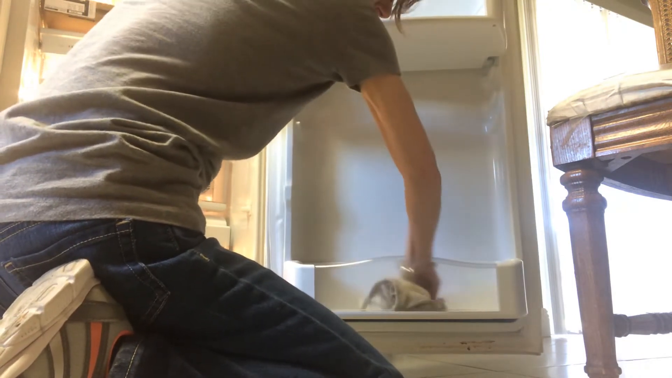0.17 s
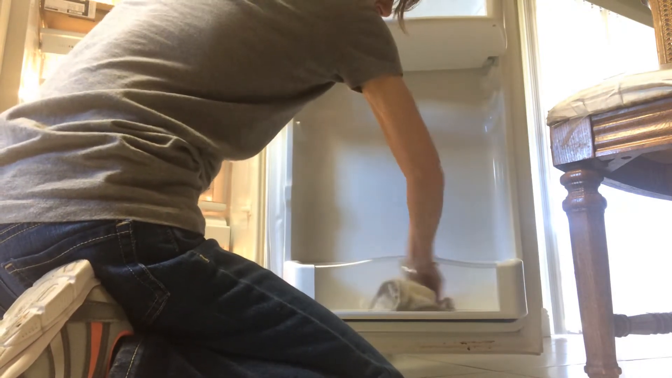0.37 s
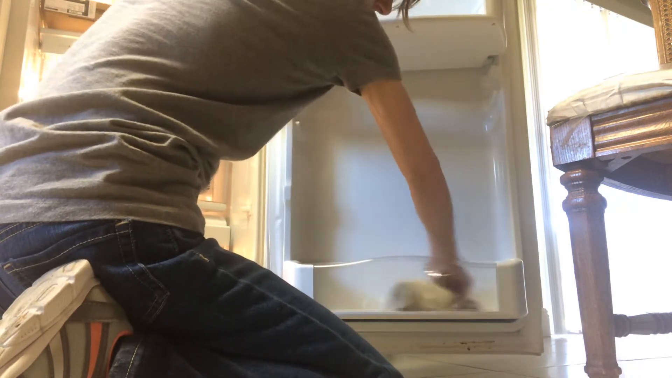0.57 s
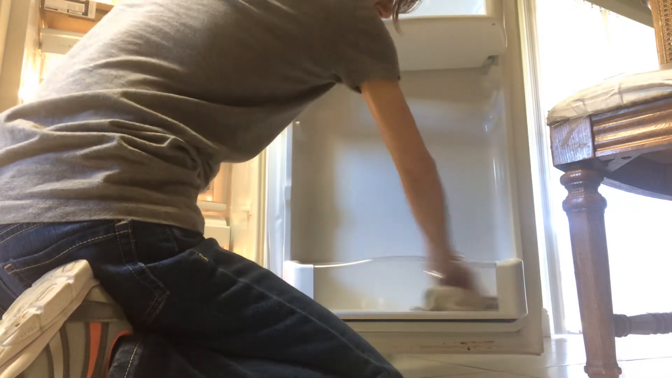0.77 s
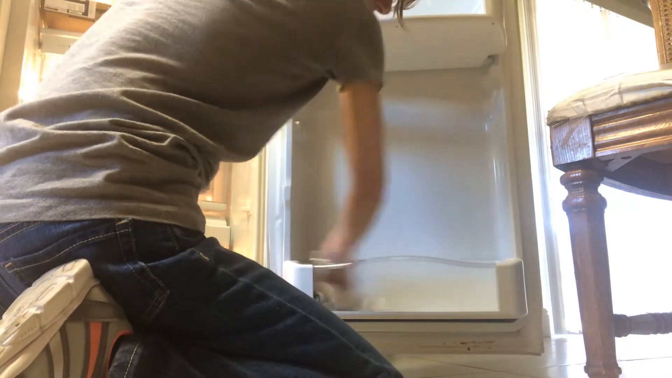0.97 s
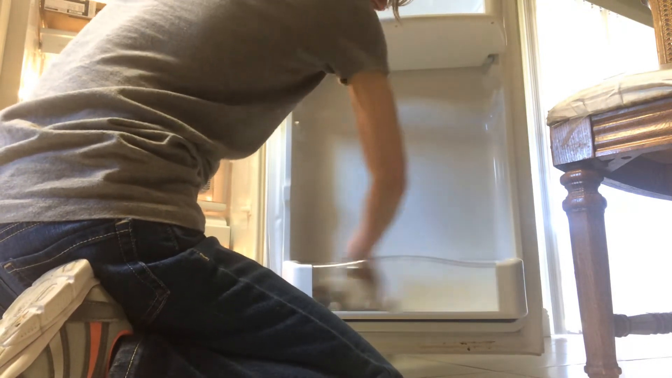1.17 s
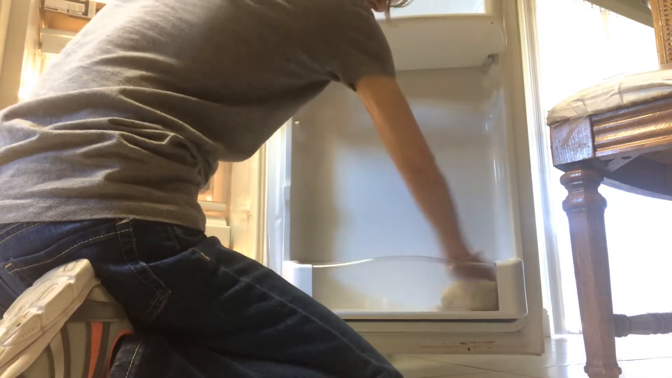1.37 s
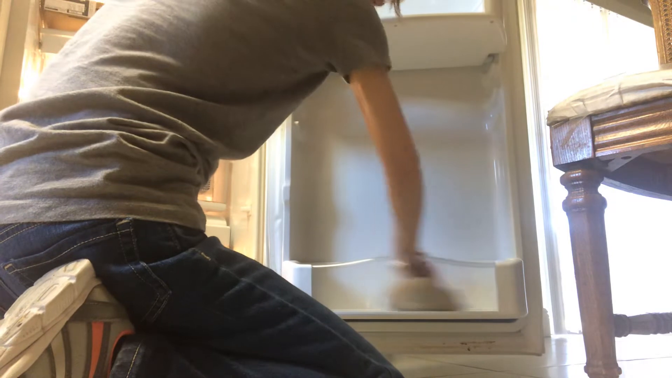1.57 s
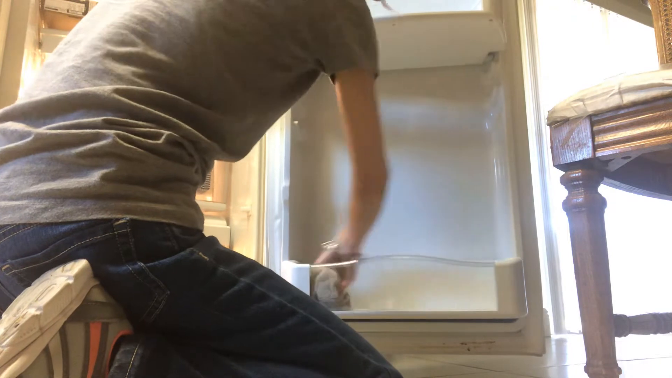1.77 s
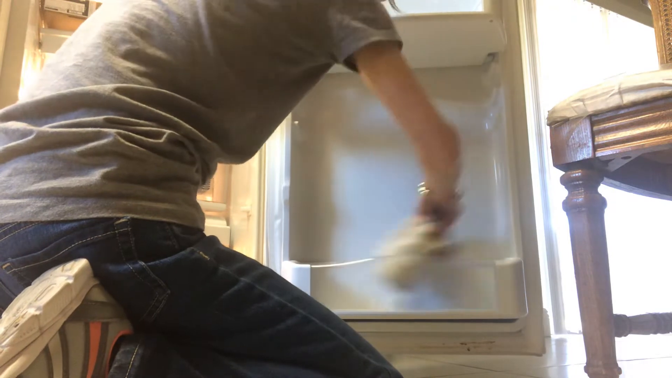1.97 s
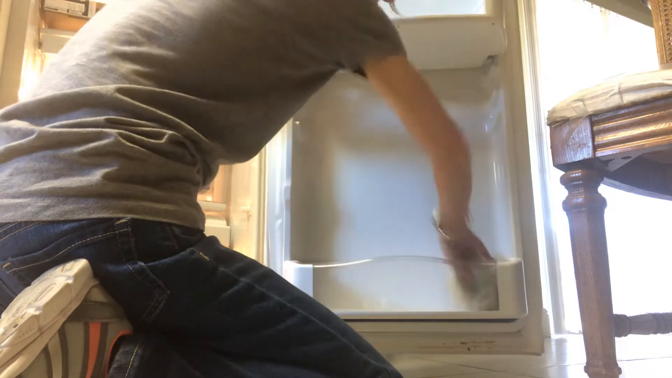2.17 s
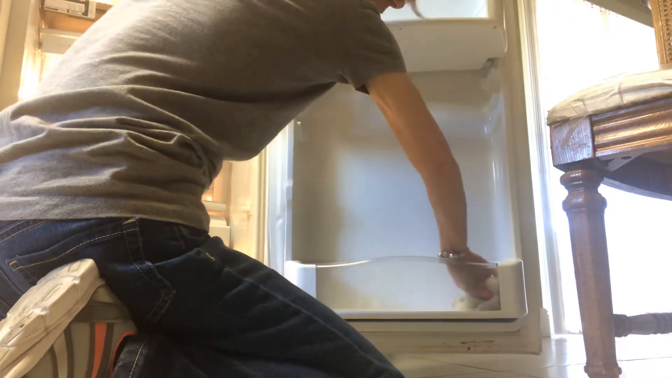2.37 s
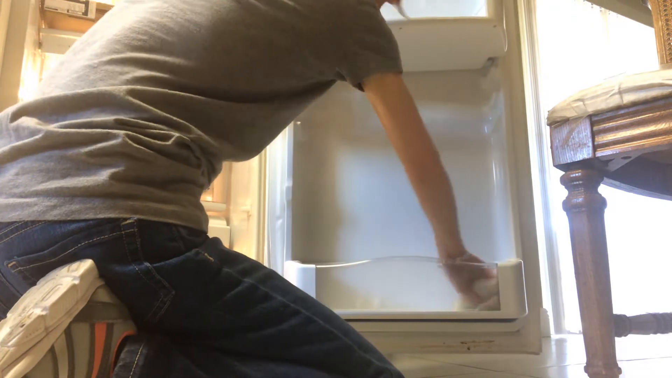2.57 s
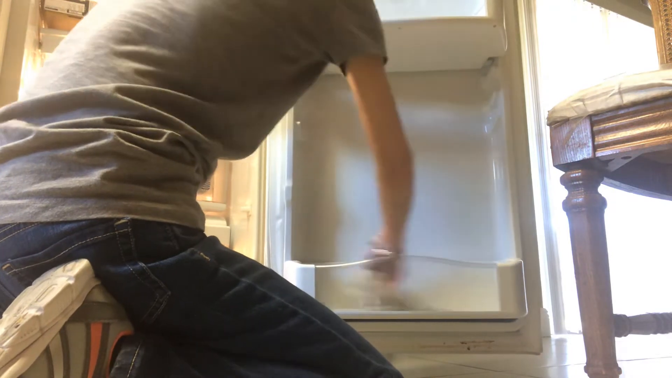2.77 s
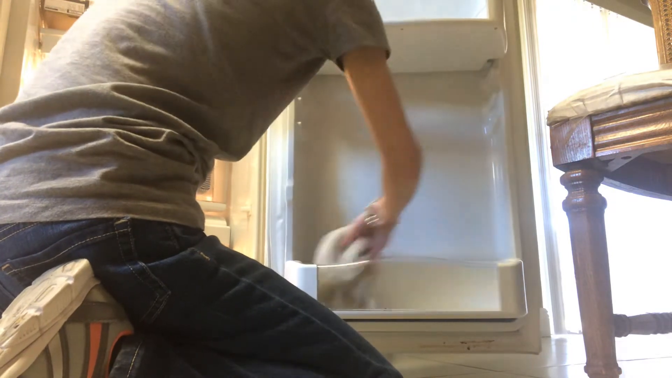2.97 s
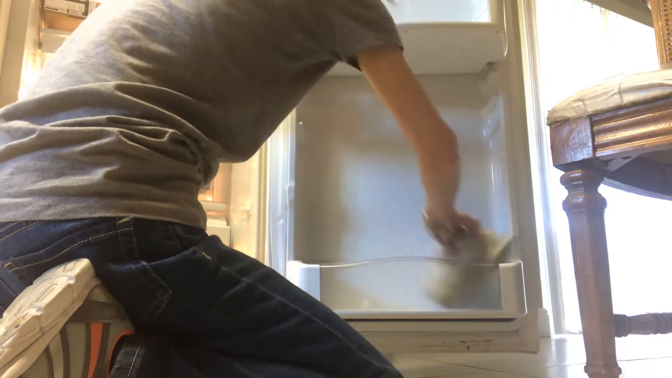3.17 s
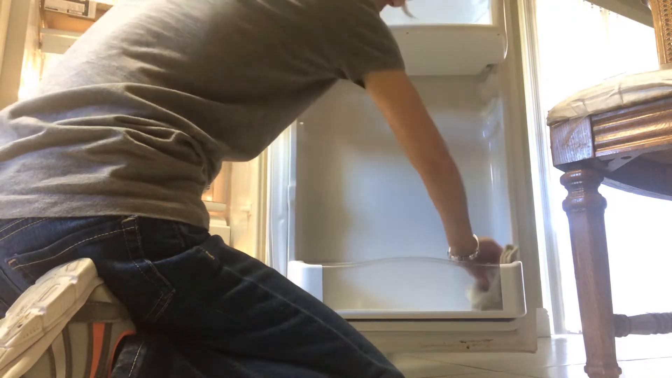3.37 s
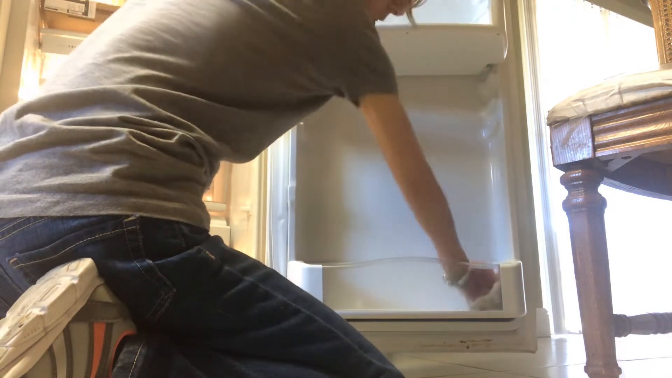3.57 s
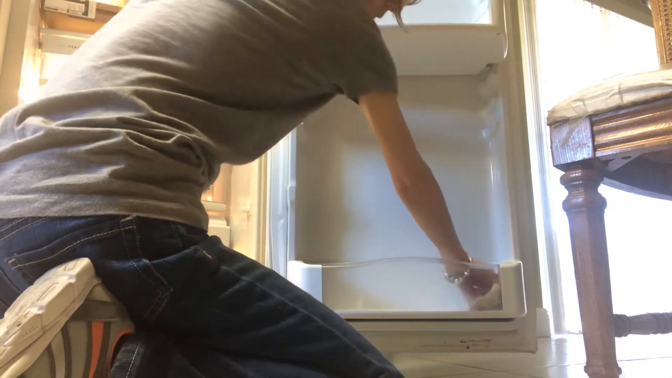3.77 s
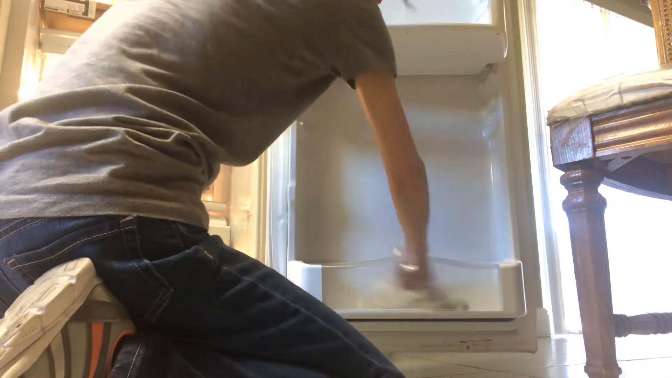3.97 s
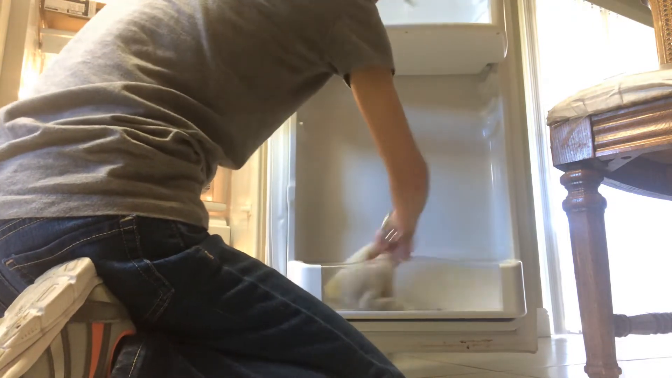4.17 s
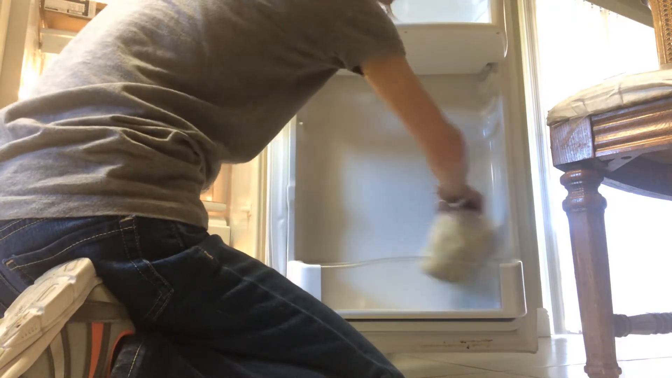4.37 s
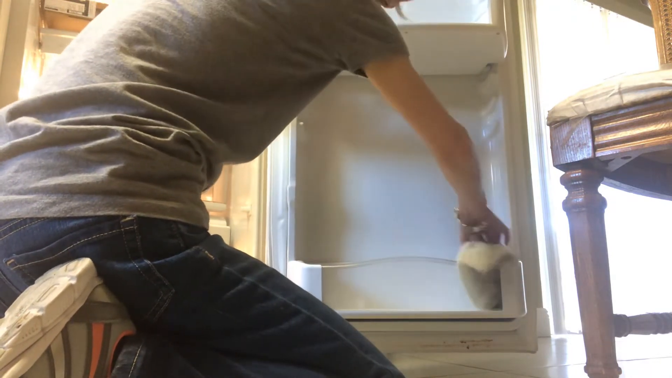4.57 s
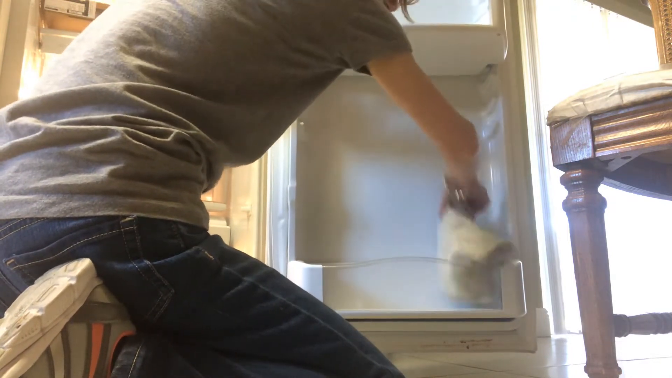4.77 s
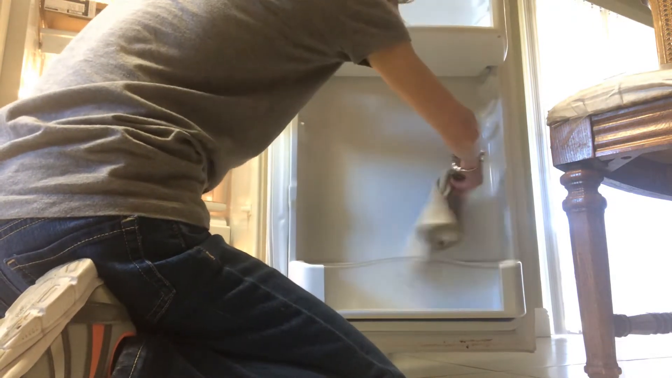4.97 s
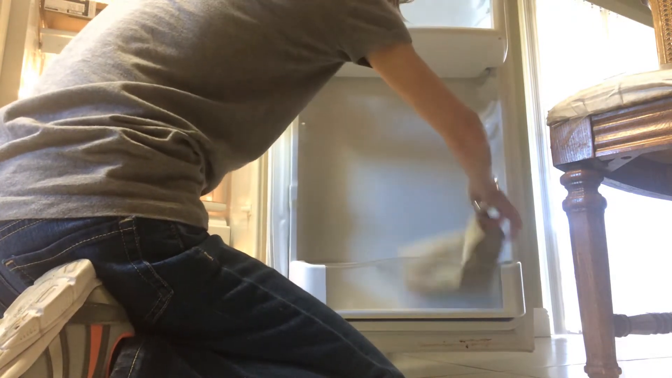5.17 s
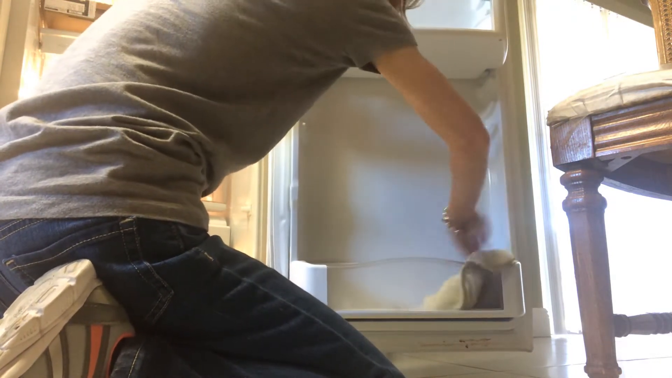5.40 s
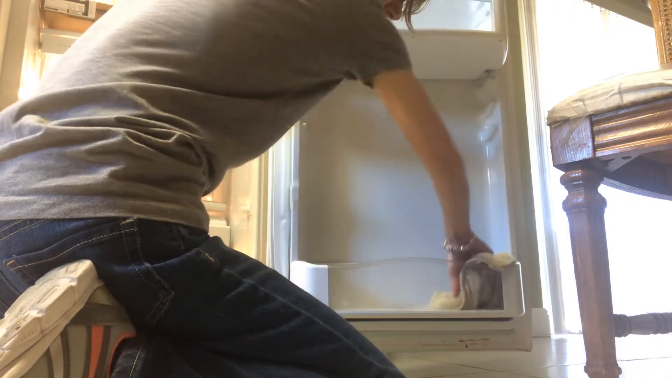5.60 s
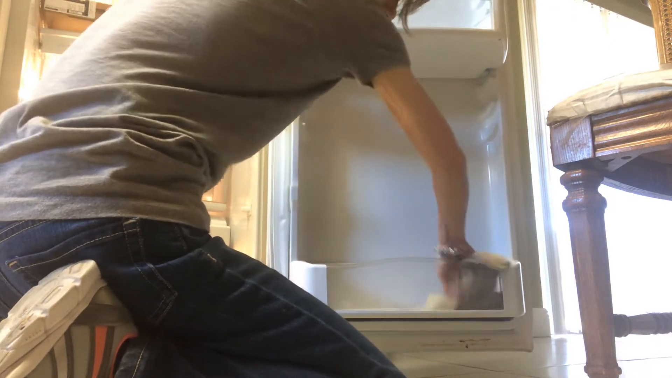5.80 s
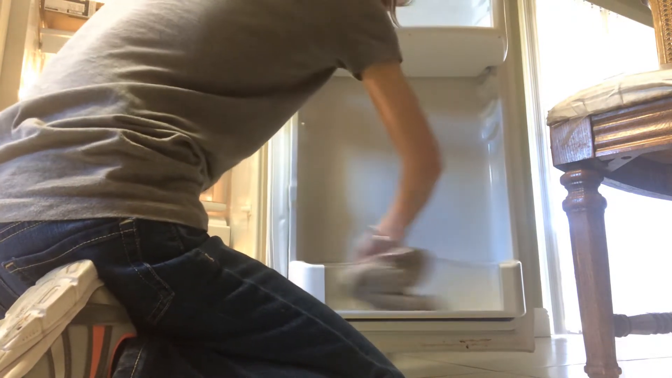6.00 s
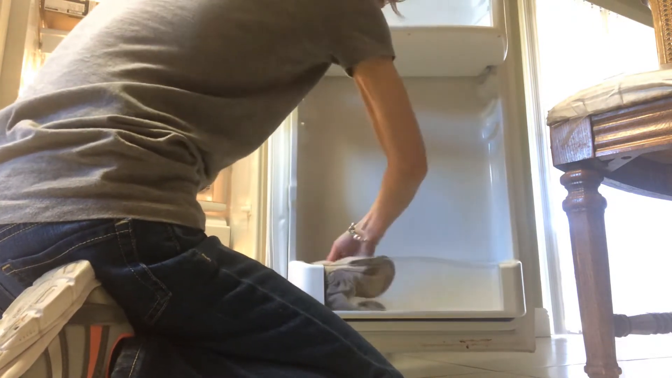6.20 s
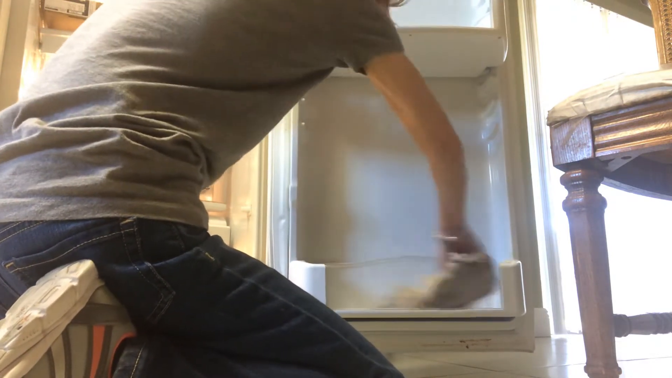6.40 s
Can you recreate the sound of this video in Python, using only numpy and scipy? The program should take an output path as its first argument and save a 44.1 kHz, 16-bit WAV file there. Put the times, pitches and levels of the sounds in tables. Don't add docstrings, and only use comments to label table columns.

```python
import sys
import numpy as np
from scipy import signal
from scipy.io import wavfile
from scipy.ndimage import uniform_filter1d

SR = 44100
rng = np.random.default_rng(int(sys.argv[2]) if len(sys.argv) > 2 else 0)


def amplitude_ratio(level_db):
    exponent = np.asarray(level_db, float) / 20
    return 10 ** exponent


def wav_out(sig):
    wavfile.write(sys.argv[1], SR, np.round(np.clip(np.atleast_2d(sig).T, -1, 1) * 32767).astype(np.int16))


N = 284004
T = np.arange(N) / SR
SLOW = T[::44]

# [t/s, peak level/dB, lower mode f/Hz, upper mode relative level/dB]
THUDS = [(0.0, -37.5, 328, -9), (0.18, -28.5, 346, -3), (0.237, -25.5, 309, -4), (0.26, -33, 318, -16.5),
         (0.428, -29, 351, -3), (0.486, -29.5, 311, 0.5), (0.747, -21, 390, 4), (1.202, -35, 292, -19),
         (1.721, -38, 402, 3), (2.003, -33, 344, 3), (2.029, -33.5, 393, 4), (2.633, -16.5, 400, -5),
         (2.673, -25, 404.2, -18), (2.845, -30.5, 419, 22), (3.795, -37.5, 353, 14), (4.123, -14, 367, -6),
         (5.59, -33, 330, -11), (5.615, -36, 300, -11), (5.844, -30, 330, -10), (6.311, -26, 345, -0.5)]
# [t/s, peak level/dB, mode f/Hz, upper mode relative level/dB, contact t/s]
SLAPS = [(1.41, -23, 300, -10, .012), (1.423, -23, 300, -6, .022), (1.445, -27, 260, -15, .014),
         (2.324, -13, 390, -22, .034), (4.116, -32, 390, 3, .022), (5.18, -37, 450, 3, .018),
         (5.32, -36, 330, -10, .022), (5.355, -31, 400, -3, .018), (5.561, -21, 342, -11, .028),
         (5.819, -19, 350, 0, .025), (5.856, -28, 366, -8, .026)]
# [t/s, peak level/dB, time to fall 60 dB t/s]
JOLTS = [(1.144, -35.5, 0.041), (1.349, -30.5, 0.15), (1.374, -15, 0.09), (2.236, -37.5, 0.15),
         (2.352, -23, 0.15), (2.435, -34, 0.12), (2.547, -33, .2), (2.582, -28.5, 0.2),
         (3.288, -36.5, 0.09), (3.348, -25.5, 0.18), (3.485, -32.5, 0.049), (3.527, -27.5, 0.059),
         (4.13, -22, 0.18), (5.334, -36, 0.033), (5.347, -32, 0.03), (6.268, -39.5, 0.068)]
UPPER_HZ = 478.7
DOOR_HZ = 241.5

# [start t/s, length t/s, hiss level/dB, duller part relative level/dB]
STROKES = [(-.05, 0.16, -59.5, -0.5), (0.173, 0.037, -64, 0.5), (0.276, 0.064, -62.5, 0),
           (0.425, 0.055, -64.5, 2), (0.54, 0.24, -61, -0.5), (0.87, .19, -61, 0.5),
           (1.085, 0.026, -66, -5), (1.17, 0.2, -63.5, -1.5), (1.385, 0.023, -58, 8),
           (1.516, 0.34, -62.5, 0.5), (1.93, 0.079, -63, 2.5), (2.19, 0.2, -66.5, -3),
           (2.354, 0.12, -55.5, 12), (2.528, .09, -63, 6), (2.656, 0.021, -54, 11.5),
           (2.736, 0.073, -63.5, 2), (2.86, 0.021, -57, 3), (2.988, 0.039, -69.5, 8.5),
           (3.239, 0.036, -73.5, -1), (3.36, 0.0196, -75, 4), (3.466, 0.182, -63.5, 6),
           (3.862, 0.173, -61, -0.5), (4.133, 0.04, -61, 9), (5.316, 0.041, -81, -3.5),
           (5.447, .12, -81, -5), (5.585, 0.05, -79, 11.5), (5.802, 0.08, -72.5, 9.5),
           (5.936, 0.21, -63.5, 2), (6.19, 0.036, -70, -4), (6.315, 0.15, -69.5, -1)]
# [f/Hz, level per Hz/dB]
RUB_COLOUR = [(1500, -8), (2500, 0.5), (4000, -1.5), (7500, -3)]
# [f/Hz, level per Hz/dB]
FIZZ_COLOUR = [(4500, -31), (6000, -10), (7600, 1.5), (8500, -6.5), (11000, -3), (14500, -4.5), (15700, -5),
               (16300, -28.5)]

# [t/s, shaft f/Hz, fifth order level/dB, sixth order level/dB]
MOTOR = [(0, 215.5, -62, -60), (.7, 215.7, -62, -58), (1.4, 216, -62, -60), (1.6, 216, -62, -57),
         (2.3, 215.8, -61, -56), (2.9, 216.2, -63, -68), (3.6, 216.5, -64, -68), (4.3, 216.6, -64, -68),
         (4.9, 216.8, -65, -62), (5.2, 216.8, -64, -68), (5.7, 216.4, -62, -64), (6.44, 216.1, -62, -66)]
# [multiple of the shaft speed, rms level/dB]
STEADY_ORDERS = [(2, -56.5), (3, -67)]
# [f/Hz, width f/Hz, level/dB]
DRONES = [(55.11, 13, -2), (90, 14, -3), (139, 22, 5.5), (219.8, 28, -3.5), (236, 10, -4.5)]
# [t/s, length t/s, level/dB]
SHOVES = [(-.02, 0.027, -42), (0.232, 0.074, -46), (0.57, 0.017, -49.5), (0.72, 0.024, -48.5),
          (1.194, .04, -48.5), (1.383, 0.094, -39.5), (2.366, .05, -45.5), (2.638, 0.06, -41),
          (2.72, .05, -43), (3.34, 0.019, -53), (5.321, 0.1, -53), (5.569, 0.031, -44),
          (5.817, 0.041, -43.5), (6.29, .2, -49)]
# [f/Hz, level per Hz/dB]
AIR = [(32, -31), (50, 8), (120, -13), (400, -6.5), (750, -13.5), (900, -22), (1400, -19), (1750, -27.5),
       (3000, -34), (7000, -43.5), (8500, -62.5), (15500, -57), (16500, -76)]

# [t/s, peak level/dB, centre f/Hz, length t/s]
TICKS = [(0.099, -37, 6750, 0.005), (0.241, -41, 7460, 0.0044), (0.4818, -42, 7800, 0.0054),
         (.76, -44, 6500, .005), (1.097, -42, 9000, 0.009), (1.822, -42, 7600, 0.0087),
         (1.911, -35, 7060, 0.004), (1.9303, -35, 10400, 0.0033), (2.1206, -53, 14200, 0.004),
         (2.139, -48, 14200, 0.0045), (2.151, -42, 10400, 0.0048), (2.198, -40, 9930, 0.0045),
         (2.236, -38.5, 6760, 0.0037), (3.425, -52, 3500, 0.006), (3.446, -45, 3800, .008),
         (3.475, -38, 3500, .01), (3.516, -37, 3200, .012), (4.119, -28, 5500, .006),
         (5.121, -46, 1600, .008), (5.344, -41.5, 1250, .005), (5.35, -39.5, 1250, .005),
         (5.498, -51, 6830, 0.0041), (5.5219, -40, 10300, 0.0071), (5.7269, -49.5, 5930, 0.0045),
         (5.797, -50, 7060, 0.0061), (5.93, -43, 6870, 0.0043)]
# [t/s, peak level/dB, centre f/Hz, length t/s]
STRIKES = [
    (1.3447, -20, 11350, 0.0055),
    (1.371, -18.5, 10500, .005),
    (1.403, -26, 12000, 0.0045),
    (2.326, -14.5, 11910, 0.0096),
    (2.844, -31, 5000, 0.007),
    (3.554, -28, 11940, 0.0053),
    (4.131, -27.5, 7000, 0.007),
]
# [t/s, floor modes peak level/dB, wall modes peak level/dB, rim modes peak level/dB]
KNOCKS = [(0.738, -28, -36, -38), (1.034, -43, -48, -48.5), (1.14, -34.5, -38, -35),
          (1.345, -34.5, -35.5, -26), (1.368, -23, -22.5, -27.5), (1.4, -43, -42, -44),
          (1.989, -53, -47.5, -50), (2.325, -19, -15.5, -9), (2.362, -33, -28, -36),
          (2.436, -26.5, -23, -19), (2.525, -34, -30, -30), (2.579, -35, -25.5, -48),
          (2.631, -27, -24.5, -33), (2.651, -25, -23, -20.5), (2.677, -30, -28.5, -28),
          (2.843, -32, -28.5, -21.5), (3.342, -38, -31, -26), (3.446, -37, -37, -38),
          (3.477, -34, -30, -31.5), (3.516, -28, -31, -29), (3.528, -27, -26.5, -47.5),
          (3.552, -38, -25.5, -19), (3.791, -42.5, -48, -47), (4.12, -39, -23, -18.5),
          (4.129, -20.5, -23.5, -15.5), (5.345, -40, -46, -52), (5.572, -48, -47, -54),
          (5.83, -42, -44, -39), (5.852, -27.5, -38, -29.5)]
# [peak t/s, level/dB, build-up by 20 dB t/s, dying by 20 dB t/s]
RATTLES = [
    (1.372, -15.5, .012, 0.021),
    (2.342, -18.5, .005, .05),
    (2.44, -26, .01, 0.1),
    (2.559, -34.5, .3, 0.22),
    (2.658, -28.5, 0.061, 0.087),
    (3.352, -22, .005, 0.0426),
    (3.478, -22.5, 0.041, 0.09),
    (5.354, -48, 0.052, 0.024),
    (5.59, -42, .025, .2),
]
# [f/Hz, level/dB, time to fall 60 dB t/s]
FLOOR_MODES = [(640, -12, .015), (730, -5, .02), (790, -2, .022), (865, -1, .025), (980, -3, .02),
               (1090, 0, .035), (1190, -3, .02)]
# [f/Hz, level/dB, time to fall 60 dB t/s]
WALL_MODES = [(1300, -3, .018), (1400, -2, .02), (1505, 0, .03), (1600, -3, .018), (1705, -1, .025),
              (1900, -4, .012), (2150, -3, .012)]
# [f/Hz, level/dB, time to fall 60 dB t/s]
RIM_MODES = [(2300, -3, .008), (2665, -3, .011), (2900, -1, .012), (3150, -1, .01), (3450, -4, .007),
             (3850, -4, .008), (4250, -5, .007), (4650, -4, .01), (5100, -6, .007), (5500, -6, .006)]
# [t/s, f/Hz, peak level/dB, time to fall 60 dB t/s]
RINGS = [(0.738, 1150, -20, 0.011), (.737, 880, -15.5, 0.015), (0.743, 1050, -24, .015),
         (1.371, 2750, -31, .025), (1.368, 1800, -45, 0.024), (2.326, 2650, -14, .05),
         (2.328, 3130, -17, .04), (2.327, 4676, -13, 0.025), (2.329, 1600, -19.5, 0.08),
         (2.38, 1705, -27, .15), (2.328, 1100, -17, 0.05), (2.36, 1080, -22, .12), (2.69, 1100, -30, .08),
         (2.329, 783, -20.5, 0.069), (2.582, 1580, -37, 0.067), (2.654, 1520, -22, 0.1),
         (2.845, 2720, -24, 0.023), (2.844, 1670, -25.5, 0.085), (3.343, 2740, -22.5, 0.033),
         (3.346, 1140, -31, 0.082), (3.481, 1630, -28, 0.06), (3.532, 1625, -27.5, 0.17),
         (4.122, 782, -24, 0.057), (4.124, 1392, -28, 0.099), (4.124, 525, -24, .08), (3.52, 525, -27, .12),
         (3.48, 525, -31, .1), (2.366, 3950, -24, .06), (2.526, 2720, -32, .08), (5.131, 1745, -47, 0.03),
         (5.864, 3150, -36, 0.13), (5.885, 1050, -41, .15), (1.372, 880, -27, .06),
         (5.852, 2755, -31, 0.05), (5.853, 1500, -34, 0.04)]

# [f/Hz, time to fall 60 dB t/s]
KITCHEN = [(200, 0.19), (500, 0.46), (1500, .55), (4000, 0.41), (6200, .39), (8500, 0.25), (14000, 0.056)]


def read(points, hz):
    f, value = np.transpose(points)
    return np.interp(np.log(hz + 1), np.log(f + 1), value)


def column(rows, k):
    rows = np.asarray(rows)
    return np.interp(T, rows[:, 0], rows[:, k])


def evened(x):
    return x / np.sqrt(np.mean(x ** 2) + 1e-20)


def peaked(x, db):
    return amplitude_ratio(db) * x / (abs(x).max() + 1e-20)


def add(mix, s, sound):
    part = mix[max(round(s * SR), 0):][:len(sound)]
    part += sound[:len(part)]


def band(x, lo_hz, hi_hz):
    limits = [lo_hz, min(hi_hz, 16300)]
    return signal.sosfilt(signal.butter(3, limits, "band", fs=SR, output="sos"), x)


def swell(s, length, db, rise, sag, fall):
    u = SLOW - s
    return db - rise * np.maximum(-u, 0) - sag * np.clip(u, 0, length) - fall * np.maximum(u - length, 0)


def hiss(colour, patchy_db):
    frames, hz = N // 256 + 5, np.fft.rfftfreq(1024, 1 / SR)
    a, b, patches = rng.standard_normal((frames, 513, 3)).T
    patches = uniform_filter1d(patches, size=14, axis=0)
    patches = evened(uniform_filter1d(patches, size=8, axis=1))
    z = (a + 1j * b) * amplitude_ratio(read(colour, hz)[:, None] + patchy_db * patches)
    return evened(signal.istft(z, nperseg=1024, noverlap=768)[1][:N])


def ring(modes, spread_db, detune):
    hz, db, t60 = np.transpose(modes)[:, :, None]
    t = np.arange(0, min(t60.max(), .14), 1 / SR)
    luck = rng.standard_normal((len(modes), 2, 1))
    level = amplitude_ratio(db + spread_db * luck[:, 0] - 60 * t / t60)
    return (level * np.sin(2 * np.pi * hz * (1 + detune * luck[:, 1]) * t)).sum(0)


def thud(db, hz, upper_db, contact, t60):
    size = int(np.clip(contact, .001, .04) * SR)
    t = np.arange(size) / SR
    shake = np.cos(2 * np.pi * hz * t) + 0.74 * np.cos(2 * np.pi * UPPER_HZ * t)
    shake += 0.3 * np.cos(2 * np.pi * DOOR_HZ * t)
    modes = [(hz, 0, t60), (hz * 1.17, -6, t60), (UPPER_HZ, upper_db, t60),
             (315, -14, .05), (DOOR_HZ, -14, .05)]
    push = np.hanning(size) * shake
    return peaked(signal.fftconvolve(push, ring(modes, 0, 0.0048)), db)


def thuds():
    out = np.zeros(N)
    for s, *row in THUDS:
        add(out, s - .006, thud(*row, contact=0.019, t60=0.054))
    for s, *row in SLAPS:
        add(out, s, thud(*row, t60=.022))
    for s, db, t60 in JOLTS:
        add(out, s - .006, thud(db, hz=401, upper_db=-18, contact=.013, t60=t60))
    return out


def cloth():
    grain = amplitude_ratio(1.8 * evened(uniform_filter1d(rng.standard_normal(N), size=160)))
    rub_colour = [(900, -56.5)] + RUB_COLOUR + [(9000, -44)]
    fizz, rub = np.zeros((2, len(SLOW)))
    for s, length, db, dull_db in STROKES:
        power = amplitude_ratio(2 * swell(s, length, db, rise=350.5, sag=23.5, fall=200.5))
        fizz = fizz + power
        rub = rub + power * amplitude_ratio(2 * dull_db)
    fizz = np.sqrt(np.interp(T, SLOW, fizz)) * hiss(FIZZ_COLOUR, patchy_db=1.34)
    rub = np.sqrt(np.interp(T, SLOW, rub)) * hiss(rub_colour, patchy_db=1.5)
    return evened(grain) * (fizz + rub)


def motor():
    turns = 2 * np.pi * np.cumsum(column(MOTOR, 1)) / SR
    orders = STEADY_ORDERS + [(5, column(MOTOR, 2)), (6, column(MOTOR, 3))]
    out = np.zeros(N)
    for order, db in orders:
        waver = amplitude_ratio(1.3 * evened(uniform_filter1d(rng.standard_normal(N), size=4000)))
        out += amplitude_ratio(db) * waver * np.sin(round(order) * turns)
    return np.sqrt(2) * out


def rumble():
    noise, out = rng.standard_normal(N), np.zeros(N)
    for hz, width, db in DRONES:
        b, a = signal.iirpeak(hz, hz / width, SR)
        out += amplitude_ratio(db) * evened(signal.lfilter(b, a, noise))
    rocking = sum(amplitude_ratio(2 * swell(*row, rise=298.5, sag=0, fall=74)) for row in SHOVES)
    steady_db = -52.5
    return np.sqrt(amplitude_ratio(2 * steady_db) + np.interp(T, SLOW, rocking)) * evened(out)


def chatter(length, sharp):
    t = np.arange(3000) / SR
    contacts = rng.standard_normal(3000) * amplitude_ratio(2.55 * rng.standard_normal(3000))
    contacts *= amplitude_ratio(-20 * t / np.clip(length, .001, .06)) * (1 - np.exp(-t / 0.001))
    contacts[8] += sharp
    return contacts


def crack(lo_hz, hi_hz, length):
    return band(chatter(length, 2.02), lo_hz, hi_hz)


def family(drive, modes, grit=4.0):
    response = ring(modes, 2, .015)
    response[0] += grit * len(modes)
    return band(signal.fftconvolve(drive, response), modes[0][0], modes[-1][0])


def knock(floor_db, wall_db, rim_db):
    contact_s = .011
    top_hz = 3340 * 2 ** ((rim_db + 37.5) / 11.5)
    drive = band(chatter(contact_s, 2.7), 250, max(top_hz, 2500))
    out = np.zeros(9000)
    for modes, db in ((FLOOR_MODES, floor_db), (WALL_MODES, wall_db), (RIM_MODES, rim_db)):
        add(out, 0, peaked(family(drive, modes), db))
    crack_db = 2 + 1.66 * rim_db
    add(out, 0, peaked(crack(3700, 9800, 1.37 * contact_s), crack_db))
    return out


def rattle(db, rise, fall):
    t = np.arange(-rise, 2 * fall, 1 / SR)
    unevenness = evened(uniform_filter1d(rng.standard_normal(len(t)), size=90))
    contacts = rng.standard_normal(len(t)) * amplitude_ratio(3.0 * unevenness)
    walls = evened(family(contacts, FLOOR_MODES + WALL_MODES + RIM_MODES[:4])[:len(t)])
    hollow_modes = [(340, -3, .06), (405, 0, .08), (UPPER_HZ, -3, .06)]
    hollow = evened(family(contacts, hollow_modes, grit=0)[:len(t)])
    drop_db = 20 * np.maximum(-t / rise, t / fall)
    level = amplitude_ratio(db - 11.5) * signal.windows.tukey(len(t), .1)
    return level * (amplitude_ratio(-drop_db) * walls + amplitude_ratio(-1.5 - drop_db / 2.4) * hollow)


def bin_hits():
    out = np.zeros(N)
    for s, *row in KNOCKS:
        add(out, s - .0008, knock(*row))
    for s, db, rise, fall in RATTLES:
        add(out, s - rise, rattle(db, rise, fall))
    for s, db, hz, length in TICKS + STRIKES:
        add(out, s, peaked(crack(0.46 * hz, 2.5 * hz, length), db))
    return out


def rings():
    out = np.zeros(N)
    for s, hz, db, t60 in RINGS:
        pair = ring([(hz, 0, t60), (0.65 * hz, -5, t60)], 0, 0)
        sound = signal.fftconvolve(chatter(0.0056, 5.5), pair)
        add(out, s, peaked(band(sound, .4 * hz, 1.6 * hz), db))
    return out


def kitchen(x):
    out, at = np.zeros(N), np.arange(200, SR - 20, 20)
    x = signal.lfilter(*signal.butter(1, 245.75, "high", fs=SR), x)
    for k in range(3):
        taps = np.zeros(SR)
        taps[at + rng.integers(0, 20, len(at))] = rng.choice([-1., 1.], len(at))
        hz, t, z = signal.stft(taps, SR, nperseg=256)
        dying = amplitude_ratio(-60 * t / read(KITCHEN, hz)[:, None])
        tail = signal.istft(z * dying, SR, nperseg=256)[1]
        turn = np.sqrt(2 / 3) * np.cos(np.pi * (60 * T + k / 3))
        out += signal.fftconvolve(x * turn, tail / np.linalg.norm(tail))[:N]
    return out


def scene():
    soft, hard, tones = thuds(), bin_hits(), rings()
    echoes = amplitude_ratio(-7.5) * kitchen(hard + amplitude_ratio(-1) * soft + amplitude_ratio(-8) * tones)
    air = amplitude_ratio(-53.5) * hiss(AIR, patchy_db=1.5)
    steady = cloth() + motor() + rumble() + air
    return (soft + hard + tones + echoes + steady)[None]


def low_pass(x):
    return signal.sosfilt(signal.butter(12, 16830, fs=SR, output="sos"), x)


def record(dry):
    cut = signal.sosfilt(signal.butter(6, 45, "high", fs=SR, output="sos"), dry)
    cut = signal.sosfilt(signal.butter(26, 15900, fs=SR, output="sos"), cut)
    return low_pass(cut)


dry = scene()
out = record(dry)
wav_out(out)
```